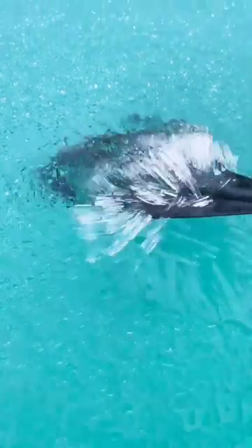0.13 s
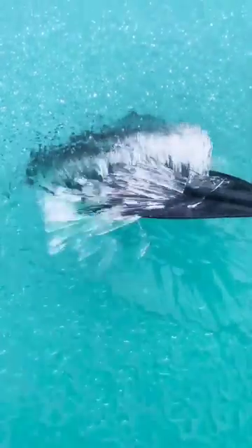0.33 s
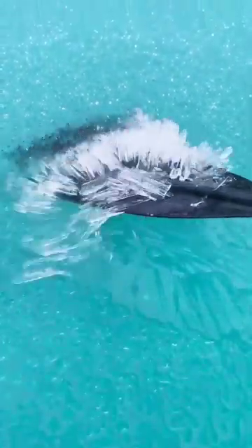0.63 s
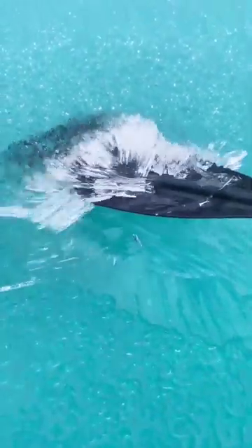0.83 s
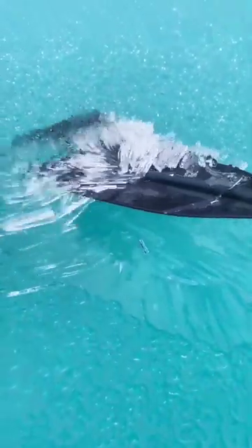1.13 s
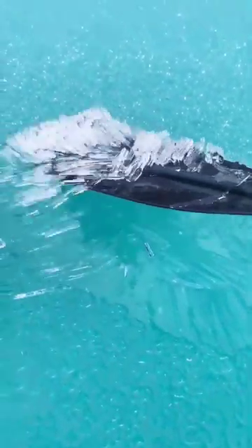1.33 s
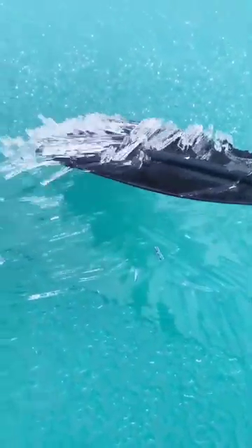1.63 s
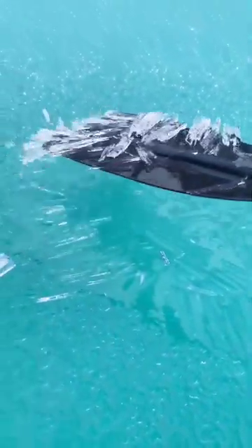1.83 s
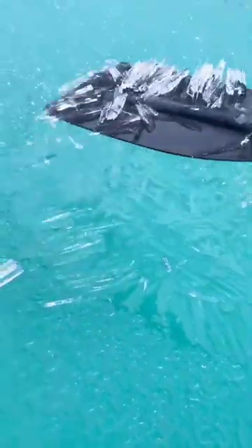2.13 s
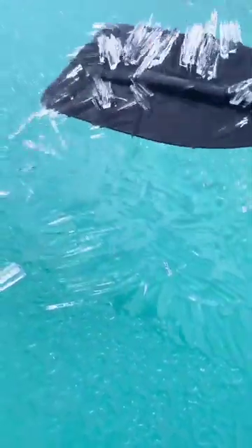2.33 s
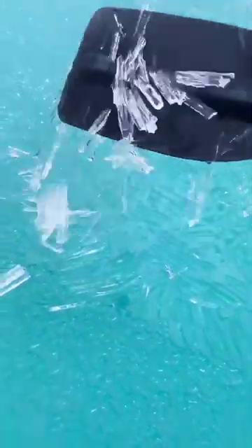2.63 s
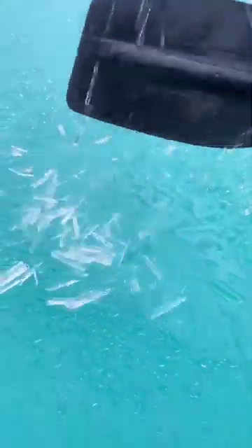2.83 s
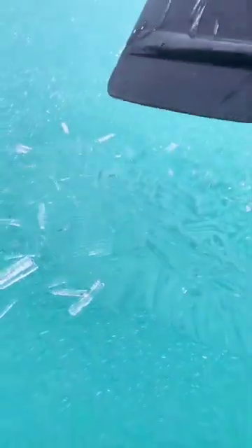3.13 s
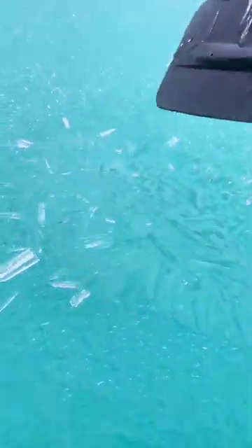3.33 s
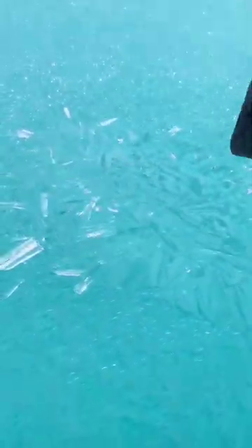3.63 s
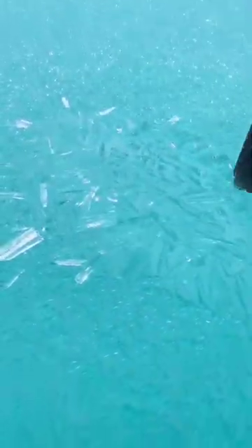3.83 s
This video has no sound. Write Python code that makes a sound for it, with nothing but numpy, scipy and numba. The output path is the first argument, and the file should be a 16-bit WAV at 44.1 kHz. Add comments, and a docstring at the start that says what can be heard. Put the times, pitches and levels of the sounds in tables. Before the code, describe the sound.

Ice needles tinkle and rustle brightly as a paddle pushes through slushy lake water, then shed off

```python
"""Lake: a paddle blade ploughs through loose candle ice, lifts, and the needles slide off and rain back.
Rods are short decaying sines with noise cracks over a rustle; louder clumps clink and one rod bounces.
Slush is upward-gliding bubbles over banded noise. The blade rings when rapped, and dips in as a noise
splash at the end. Light wind rumbles and thumps on a close phone microphone over faint lake noise."""
import sys
import numpy as np
from scipy import signal
from scipy.fft import rfft, irfft
from scipy.io import wavfile
from scipy.ndimage import uniform_filter1d
from numba import njit

SR = 44100
rng = np.random.default_rng(int(sys.argv[2]) if len(sys.argv) > 2 else 0)


def inscribe(sig):
    """Save sig as 16-bit PCM at rate SR to the path in sys.argv[1].

    A 1-D sig is mono; a 2-D sig holds one channel per row.
    Samples are clipped to [-1, 1] before scaling.
    """
    pcm = np.round(np.clip(np.atleast_2d(sig).T, -1, 1) * 32767)
    wavfile.write(sys.argv[1], SR, pcm.astype(np.int16))


N = 176400

# stir of the ice, base levels:
# (time [s], tinkle level [dB], tinkle low-part gain [dB], slush level [dB])
STIR = [(0, -24.5, 1.5, -38.5), (0.45, -23, 0.5, -34.5), (0.58, -25, 0.5, -38.5), (0.7, -21.5, 1, -31.5),
        (0.95, -23.5, -1, -36), (1.2, -27.5, 3.5, -38.5), (1.45, -30, 2, -40.5), (1.65, -27.5, 1.5, -34),
        (1.92, -26, 3.5, -33.5), (2.08, -32, 2.5, -44), (2.3, -38.5, -0.5, -49.5), (2.48, -42, 1, -52),
        (2.63, -35.5, 2, -46), (2.72, -28.5, 3.5, -36.5), (2.86, -18, -6.5, -40.5), (2.91, -27, 2, -48.5),
        (2.97, -21, -8, -42.5), (3.03, -29.5, -2, -47), (3.12, -32.5, -5.5, -54.5), (3.31, -44.5, -9, -66),
        (3.451, -61.5, -1, -64.5), (3.65, -71, 3, -72)]
# loudest clumps of clinks: (time [s], length [s], base level [dB], leading pitch [Hz])
CLINKS = [(0.362, 0.014, -19, 4350), (0.421, 0.015, -19.5, 5600), (0.462, 0.0038, -17.5, 9010),
          (0.744, 0.0066, -22.5, 9080), (1.887, 0.0075, -23, 6820), (2.033, 0.0029, -25, 5330),
          (2.107, 0.0072, -27.5, 9110), (2.157, 0.0071, -26.5, 3820), (2.183, 0.0077, -28, 10200),
          (2.221, 0.017, -30.5, 9000), (2.274, 0.0055, -28.5, 4760), (2.285, 0.0068, -25.5, 5030),
          (2.327, 0.0037, -30, 5200), (2.347, 0.016, -27.5, 7700), (2.396, 0.0066, -31, 9030),
          (2.506, 0.005, -30.5, 6530), (2.534, 0.002, -29, 9210), (2.553, 0.01, -26.5, 9780),
          (2.564, 0.0052, -22.5, 7200), (2.596, 0.0032, -30, 4200), (2.618, 0.002, -36, 5560),
          (2.685, 0.012, -19.5, 9080), (2.84, 0.022, -19, 8850), (2.935, 0.016, -21, 10400),
          (2.962, 0.023, -19, 9410), (3.017, 0.0042, -20, 9370), (3.16, 0.0046, -27, 9250),
          (3.258, 0.0032, -45, 4020), (3.26, 0.0042, -26.5, 10100), (3.263, 0.02, -41, 1800),
          (3.284, 0.004, -34, 5200), (3.369, 0.0084, -37.5, 9030), (3.388, 0.006, -50, 4750),
          (3.775, 0.008, -56.5, 8930)]
# one rod bouncing to rest: (time [s], level [dB])
BOUNCES = [(3.172, -25), (3.185, -22.5), (3.212, -29), (3.29, -26.5), (3.316, -34), (3.366, -30)]
# rods rapping the blade: (time [s], level [dB])
RAPS = [(2.536, -35.5), (2.599, -41), (2.654, -33), (2.975, -29.5), (3.927, -28), (3.933, -19),
        (3.947, -27), (3.961, -29)]
# blade modes, nominal pitch: (frequency [Hz], level re rap [dB])
BLADE_MODES = [(470, -11), (790, 0.5), (1850, -6)]
# wind thumps: (start [s], length [s], base level [dB], reference frequency [Hz])
THUMPS = [(0.21, 0.19, -41, 72.6), (0.828, .1, -43.5, 77.8), (1.32, 0.12, -38, 74),
          (1.537, 0.038, -41.5, 105.2), (2.008, 0.176, -51.5, 70), (2.277, 0.17, -53, 61.5),
          (2.579, 0.047, -48, 64.95), (3.356, 0.045, -51, 139.7), (3.41, 0.051, -57, 131)]
# filter gains of ice, blade splash, wind and lake: (frequency [Hz], gain [dB])
ICE = [(400, -21), (798, -8.5), (1090, -10), (1230, -6), (1600, -14), (1800, -6), (2050, -12.5),
       (2280, -9.5), (2620, -13), (3320, -5.5), (6130, -3.5), (7300, -5.5), (9100, 2), (10900, -0.5),
       (12300, -11.5), (12700, -25), (15500, -28.5)]
DIP = [(100, -47), (260, -10.5), (1700, -9.5), (5310, -15.5), (9010, -5.5), (12200, -15.5), (13000, -48)]
WIND = [(30, -28), (60, 1), (110, -2.5), (250, -11.5)]
LAKE = [(40, -44.5), (200, -6.5), (420, -6), (650, -15), (5250, -35), (9110, -17), (12000, -56)]

SPLIT_HZ, TOP_HZ = 2500, 15400  # slush / rod rustle split; upper limit
BIGGEST_DB = 11  # cap on the random size of a knock or bubble
KNOCK_SPREAD_DB, RUSTLE_DB, CRACK_DB = 4.5, -5, -2.5  # rustle re knocks, cracks re rings
ROD_BASE_T60_S, CRACK_DECAY_S = 0.024, 0.00096  # each rod scales the T60
CLINK_MEAN_T60_S, LEAD_DB, OTHERS_DB = 0.035, -3, -5  # levels re clump
LEAD_SPREAD = 0.05  # full width, fraction of pitch
RATTLE_DB, RATTLE_RISE_S, RATTLE_RELEASE_S = -5, 0.001, 0.0019  # time constants
BOUNCE_HZ, BOUNCE_T60_S = 6100, 0.041
TOP_BOOST_START_S, TOP_BOOST_HZ, TOP_BOOST_DB = 2.25, 12180, 14
BUBBLE_HALF_T60_CYCLES, BUBBLE_GLIDE, SLOSH_DB = 8.8, 0.22, 3.5  # glide: fraction of start pitch
DIP_START_S, DIP_DB, DIP_RISE_S, DIP_T60_S = 3.921, -24.5, 0.011, 0.32
BLADE_T60_S = 0.043
WIND_DB, WIND_DROP_S, WIND_FADE_S = -59.5, 2.89, 0.3  # level before drop and final band
LAKE_DB = -68.5


def undb(db):
    """Amplitude factor from dB."""
    return 10 ** (np.asarray(db) / 20)


def unit(x):
    """Scale to RMS 1."""
    return x / np.sqrt(np.mean(x ** 2))


def colour(x, points):
    """Minimum-phase filter with the gain of (Hz, dB) points, built by folding the cepstrum."""
    hz, db = np.array(points, float).T
    bin_hz = np.arange(1, 2050) * SR / 4096
    log_gain = np.interp(np.log(bin_hz), np.log(hz), db) * np.log(10) / 20
    cepstrum = irfft(log_gain)
    cepstrum[1:2048] *= 2
    cepstrum[2049:] = 0
    impulse = irfft(np.exp(rfft(cepstrum)))
    return signal.fftconvolve(x, impulse)[:len(x)]


def band(x, lo_hz, hi_hz):
    """Butterworth bandpass."""
    return signal.sosfilt(signal.butter(2, [lo_hz, hi_hz], "bandpass", fs=SR, output="sos"), x)


@njit
def ring(n, start_s, hz, t60_s, size, glide, sr):
    """Sum of decaying sines with soft onsets; pitch climbs by the fraction glide over each T60."""
    out = np.zeros(n)
    for k in range(len(start_s)):
        first = int(start_s[k] * sr)
        m = int(t60_s[k] * sr) + 2
        step = np.exp(2j * np.pi * hz[k] / sr - np.log(1000) / (t60_s[k] * sr))
        turn = np.exp(2j * np.pi * hz[k] * glide / sr / m)
        z, rise = size[k] + 0j, 0.
        for i in range(max(first, 0), min(first + m, n)):
            rise += (1 - rise) * 40 / m
            out[i] += z.imag * rise
            z *= step
            step *= turn
    return out


def walk(rate_hz):
    """Random levels held 1 / rate_hz and smoothed twice; spread near 1."""
    k = int(SR / rate_hz)
    held = np.repeat(rng.standard_normal(N // k + 1), k)
    return 1.206 * uniform_filter1d(uniform_filter1d(held, k), k)[:N]


def flicker(points, lo_hz, count, own_db, rate_hz):
    """Noise in half-octave bands, each wavering on its own, then coloured."""
    edges_hz = lo_hz * 2 ** (np.arange(count + 1) / 2)
    total = np.zeros(N)
    for lo, hi in zip(edges_hz, edges_hz[1:]):
        noise = band(rng.standard_normal(N), lo, min(hi, 0.49 * SR))
        total += undb(own_db * walk(rate_hz)) * noise
    return colour(total, points)


def tinkle(jostle, count=16000):
    """Dense rod knocks, each a short ring, every sixth also a noise crack, over a wet rustle."""
    start_s = rng.random(count) * N / SR
    size = undb(np.minimum(rng.exponential(KNOCK_SPREAD_DB, count), BIGGEST_DB))
    hz = 2400 + 10400 * rng.random(count)
    t60_s = ROD_BASE_T60_S * (0.33 + 1.84 * rng.random(count))
    rings = ring(N, start_s, hz, t60_s, size, 0., float(SR))
    crack_env = np.zeros(N)
    crack_env[(start_s[::6] * SR).astype(int)] = np.sqrt(size[::6])
    decay = np.exp(-np.arange(512) / SR / CRACK_DECAY_S)
    cracks = signal.fftconvolve(crack_env, decay)[:N] * rng.standard_normal(N)
    cracks = band(colour(cracks, ICE), SPLIT_HZ, TOP_HZ)
    rustle = band(colour(rng.standard_normal(N), ICE), SPLIT_HZ, TOP_HZ)
    knocks = unit(colour(rings, ICE)) + undb(CRACK_DB) * unit(cracks)
    mix = unit(unit(knocks) + undb(RUSTLE_DB) * unit(rustle))
    return mix * undb(1.15 * jostle + 0.96 * walk(150))


def clinks(count=8):
    """Clumps of rods ring together, three near the leading pitch, the rest scattered."""
    s, length_s, db, lead_hz = np.array(CLINKS).T[:, :, None]
    shape = len(s), count
    index = np.arange(count)
    leads = index < 3
    start_s = s + length_s * np.where(index == 0, 0, rng.random(shape))
    place = rng.random(shape)
    hz = np.where(leads, lead_hz * (1 + LEAD_SPREAD * (place - 0.5)), 1700 + 10000 * place)
    ice_db = np.interp(hz, *np.array(ICE).T)
    size = undb(db + np.where(leads, LEAD_DB, OTHERS_DB + ice_db))
    t60_s = CLINK_MEAN_T60_S * (0.5 + rng.random(shape))
    return ring(N, start_s.ravel(), hz.ravel(), t60_s.ravel(), size.ravel(), 0., float(SR))


def rattle(t):
    """Flickering ice noise gated by each clink clump, with fast rise and release."""
    push = np.zeros(N)
    for start_s, length_s, db, _ in CLINKS:
        age = np.maximum(t - start_s, 0)
        rise = 1 - np.exp(-age / RATTLE_RISE_S)
        release = np.exp(-np.maximum(age - length_s, 0) / RATTLE_RELEASE_S)
        push += undb(db) * rise * release
    noise = unit(flicker(ICE, 1380, count=7, own_db=2.5, rate_hz=78))
    return undb(RATTLE_DB) * push * noise * undb(2.0 * walk(400))


def bounces():
    """One rod bounces to rest: decaying sines at nearly one pitch."""
    s, db = np.array(BOUNCES).T
    hz = BOUNCE_HZ * (1 + 0.0084 * rng.standard_normal(len(s)))
    return ring(N, s, hz, np.full(len(s), BOUNCE_T60_S), undb(db), 0., float(SR))


def ice_rods(t, jostle):
    """Tinkle shaped by the stir, plus clinks, rattle, bounces; top band louder from TOP_BOOST_START_S."""
    s, tinkle_db, lower_db, _ = np.array(STIR).T
    rods = tinkle(jostle)
    lower_gain = undb(np.interp(t, s, lower_db))
    rods = rods + (lower_gain - 1) * band(rods, 1200, 6800)
    rods = rods * undb(np.interp(t, s, tinkle_db))
    rods = rods + clinks() + rattle(t) + bounces()
    top = band(band(rods, TOP_BOOST_HZ, TOP_HZ), TOP_BOOST_HZ, TOP_HZ)
    return rods + (t > TOP_BOOST_START_S) * undb(TOP_BOOST_DB) * top


def slush(t, jostle, count=1600):
    """Small bubbles glide up in pitch over a noise slosh of water between the rods."""
    start_s = rng.random(count) * N / SR
    size = undb(np.minimum(rng.exponential(3.8, count), BIGGEST_DB))
    hz = 350 + 2300 * rng.random(count)
    t60_s = BUBBLE_HALF_T60_CYCLES / hz * 2
    bubbles = ring(N, start_s, hz, t60_s, size, BUBBLE_GLIDE, float(SR))
    slosh = band(flicker(ICE, 198.2, count=8, own_db=3.0, rate_hz=30), 150, SPLIT_HZ)
    mix = unit(unit(colour(bubbles, ICE)) + undb(SLOSH_DB) * unit(slosh))
    s, _, _, slush_db = np.array(STIR).T
    return mix * undb(1.4 * jostle) * undb(np.interp(t, s, slush_db))


def dip(t):
    """The blade slaps into the slush again: a grainy noise splash with exponential decay."""
    age = np.maximum(t - DIP_START_S, 0)
    onset = (t > DIP_START_S) * (1 - 0.5 * np.exp(-age / DIP_RISE_S))  # starts at half
    decay = undb(-60 * age / DIP_T60_S)
    splash = flicker(DIP, 90.6, count=15, own_db=-4.5, rate_hz=77) * undb(2 * walk(160))
    return unit(splash) * onset * decay * undb(DIP_DB)


def blade():
    """Rods rap the blade, exciting three damped modes: a hollow, brief ring."""
    s, db = np.array(RAPS).T[:, :, None]
    mode_hz, mode_db = np.array(BLADE_MODES).T
    hz = mode_hz * (1 + 0.045 * rng.standard_normal((len(s), len(mode_hz))))
    start_s = s + np.zeros_like(hz)
    t60_s = np.full(hz.size, BLADE_T60_S)
    return ring(N, start_s.ravel(), hz.ravel(), t60_s, undb(db + mode_db).ravel(), 0., float(SR))


def wind(t):
    """Low noise rumble that dies away late, with ragged falling-pitch puffs that thump the microphone."""
    out = unit(flicker(WIND, 20.1, count=10, own_db=-3.5, rate_hz=6.4)) * undb(WIND_DB)
    out = out / (1 + np.exp((t - WIND_DROP_S) / WIND_FADE_S))
    for start_s, length_s, db, hz in THUMPS:
        x = np.clip((t - start_s) / length_s, 0, 1)
        swing_hz = hz * (1.25 - 0.57 * x + 0.3 * walk(60))
        swing = np.sin(2 * np.pi * np.cumsum(swing_hz) / SR)
        buffet = unit(band(rng.standard_normal(N), 0.64 * hz, 1.8 * hz))
        out = out + undb(db) * np.sin(np.pi * x ** 1.12) * (swing + hz / 170 * buffet)
    return band(out, 42, 600)


def lake():
    """Faint background: coloured noise in slowly wavering bands."""
    return unit(flicker(LAKE, 30, count=18, own_db=0.5, rate_hz=12)) * undb(LAKE_DB)


def scene():
    """Sum of all sources, one channel."""
    t = np.arange(N) / SR
    jostle = walk(34.97)  # shakes rods and slush together
    ice = ice_rods(t, jostle) + slush(t, jostle)
    return (ice + dip(t) + blade() + wind(t) + lake())[None]


def record(dry):
    """The phone cuts the top: steep elliptic lowpass."""
    return signal.sosfilt(signal.ellip(10, 0.2, 80, TOP_HZ, fs=SR, output="sos"), dry)


dry = scene()
out = record(dry)
inscribe(out)
```